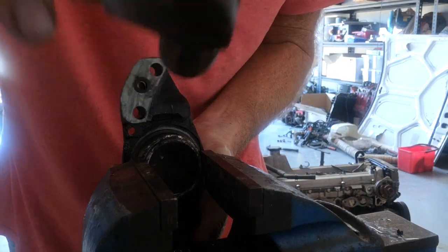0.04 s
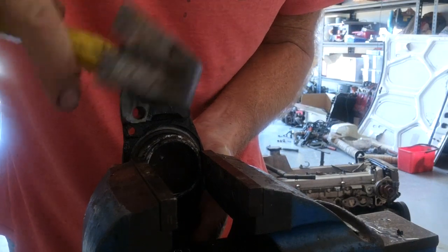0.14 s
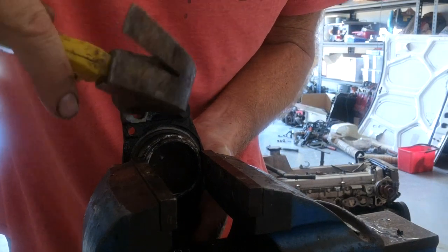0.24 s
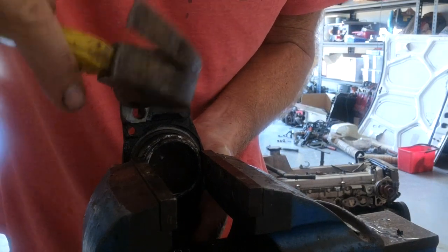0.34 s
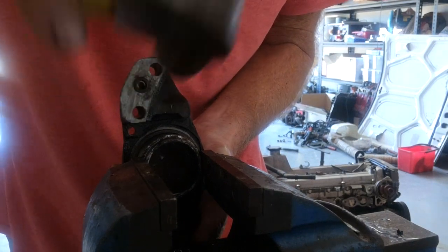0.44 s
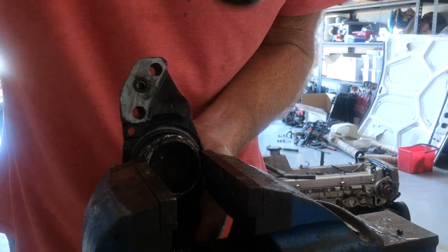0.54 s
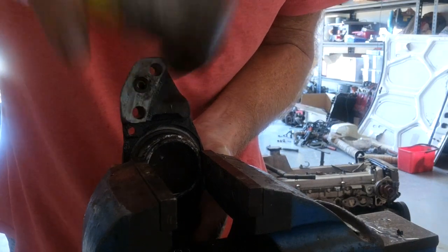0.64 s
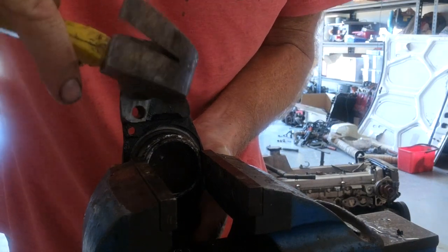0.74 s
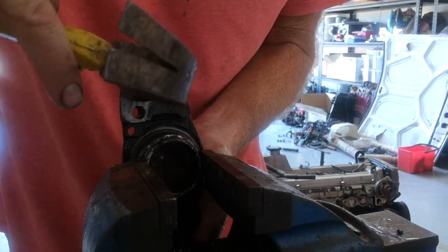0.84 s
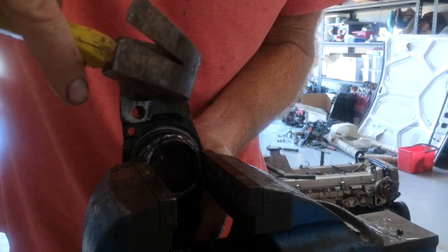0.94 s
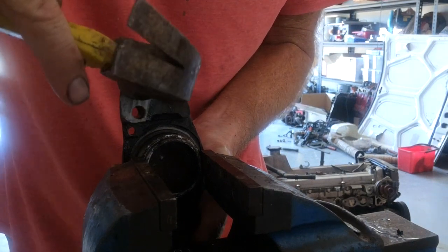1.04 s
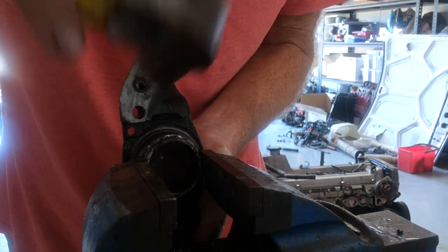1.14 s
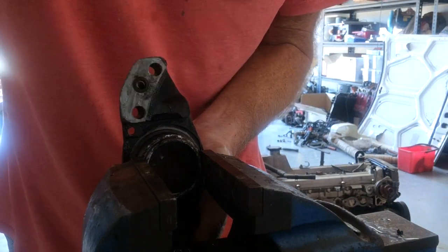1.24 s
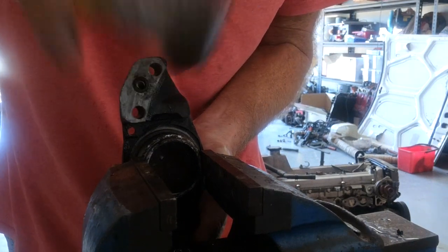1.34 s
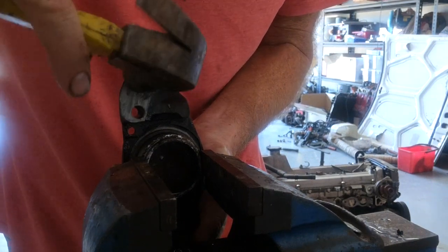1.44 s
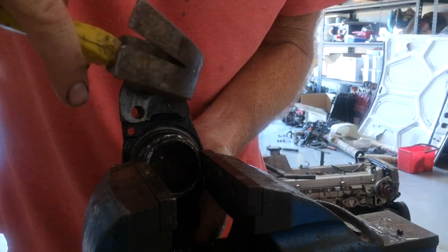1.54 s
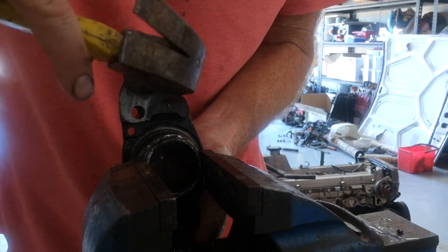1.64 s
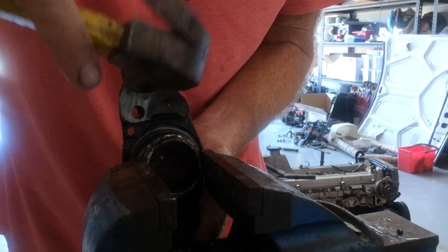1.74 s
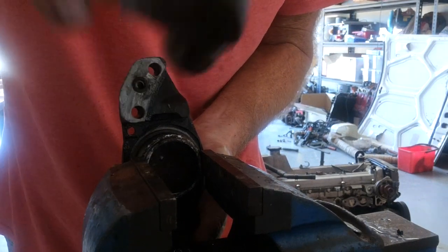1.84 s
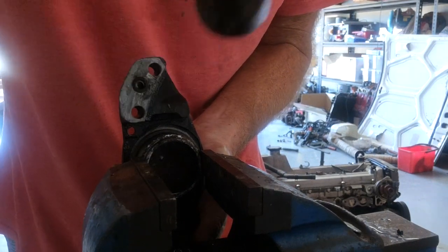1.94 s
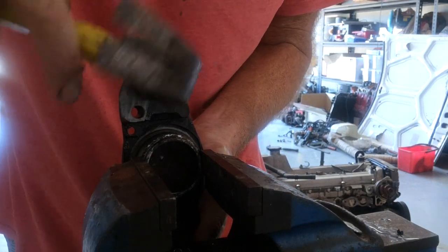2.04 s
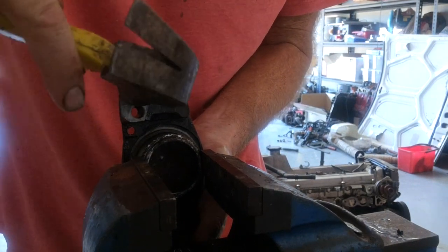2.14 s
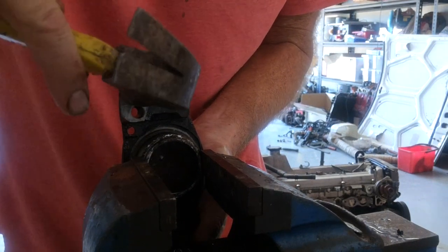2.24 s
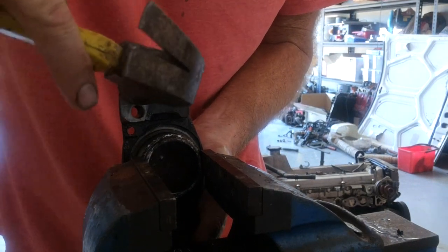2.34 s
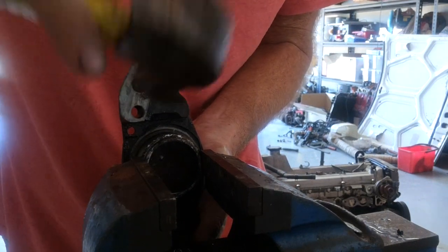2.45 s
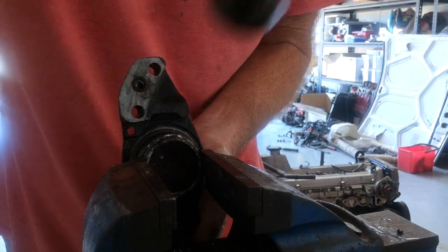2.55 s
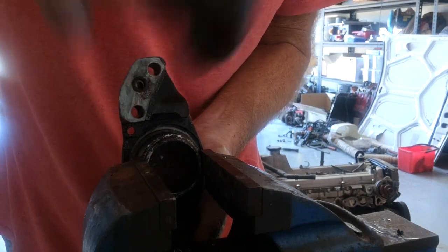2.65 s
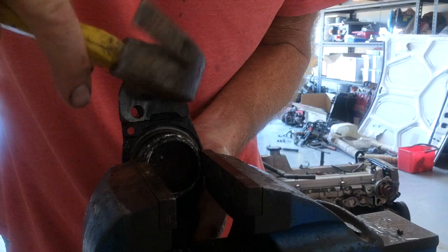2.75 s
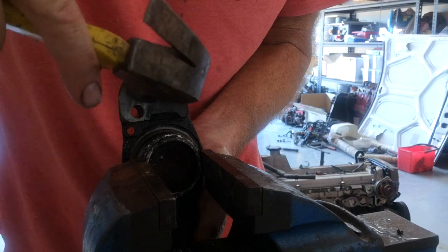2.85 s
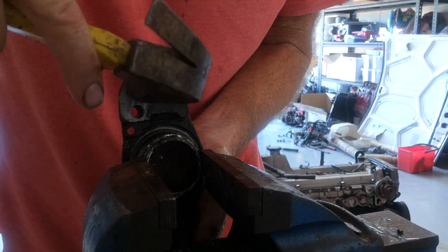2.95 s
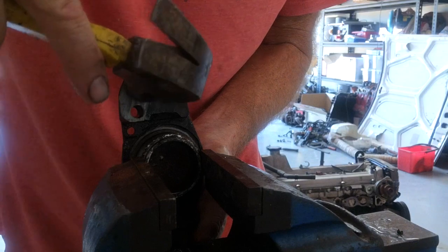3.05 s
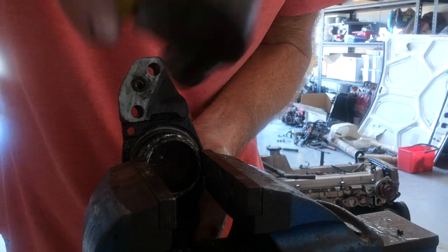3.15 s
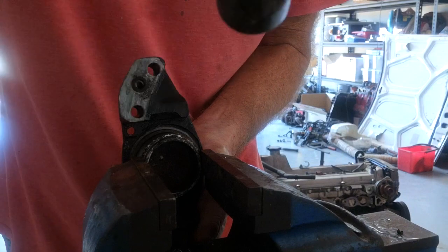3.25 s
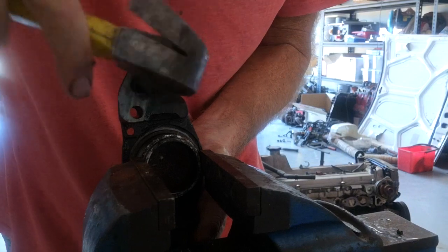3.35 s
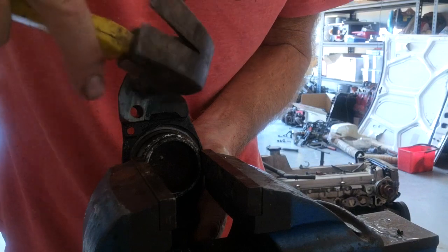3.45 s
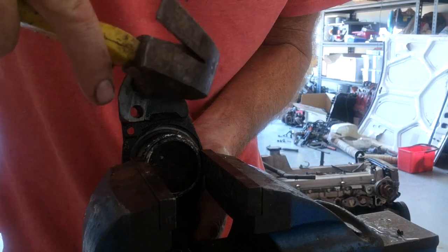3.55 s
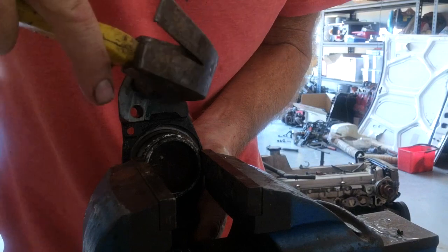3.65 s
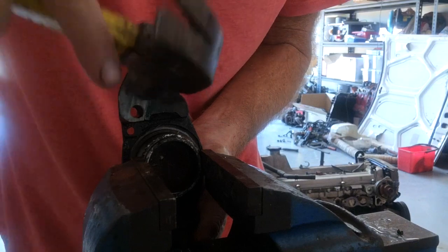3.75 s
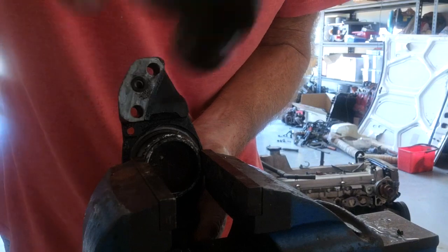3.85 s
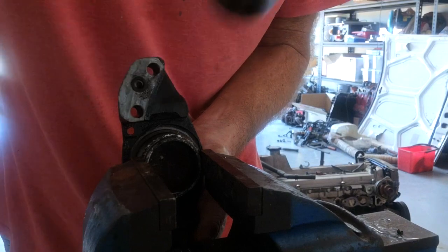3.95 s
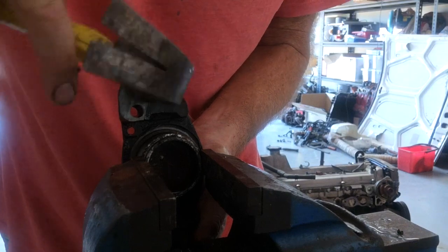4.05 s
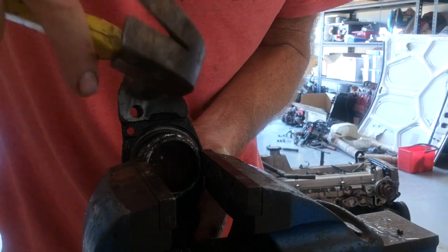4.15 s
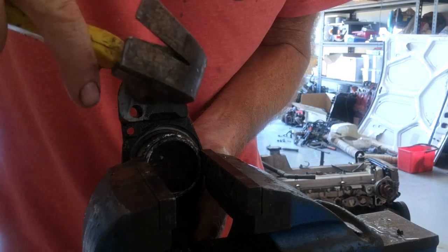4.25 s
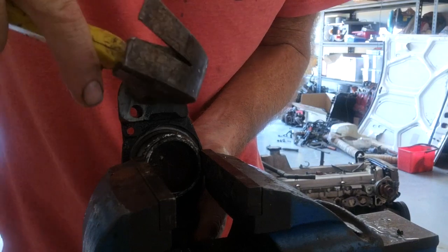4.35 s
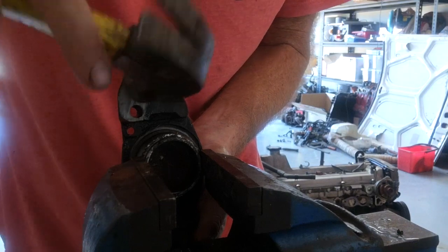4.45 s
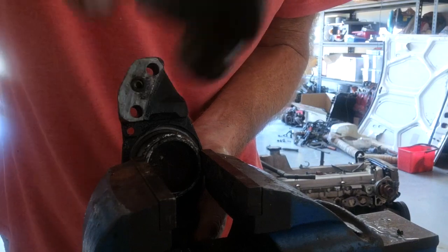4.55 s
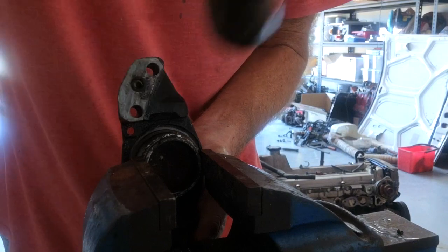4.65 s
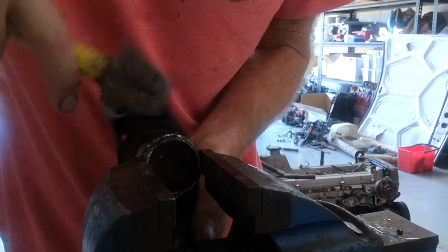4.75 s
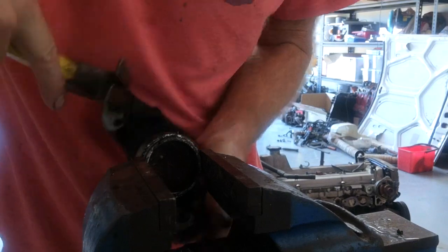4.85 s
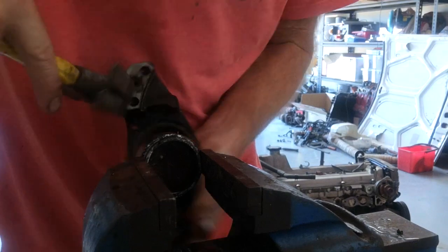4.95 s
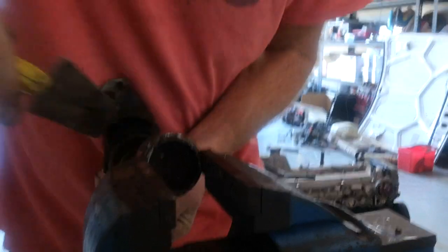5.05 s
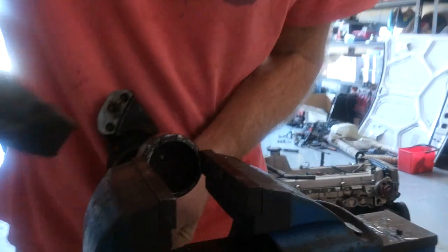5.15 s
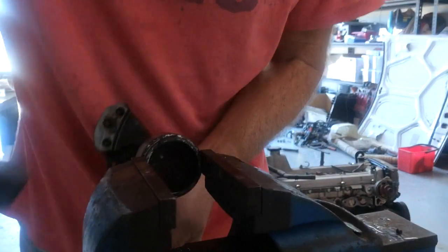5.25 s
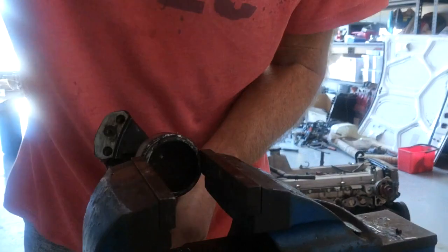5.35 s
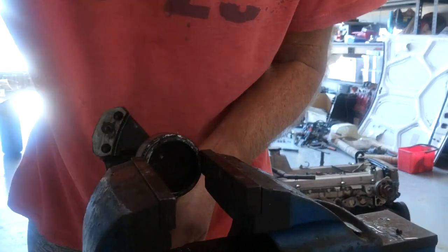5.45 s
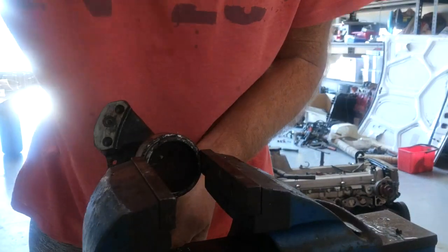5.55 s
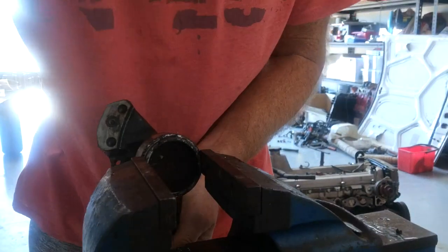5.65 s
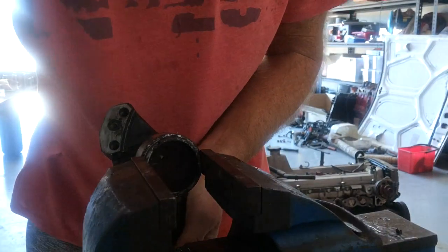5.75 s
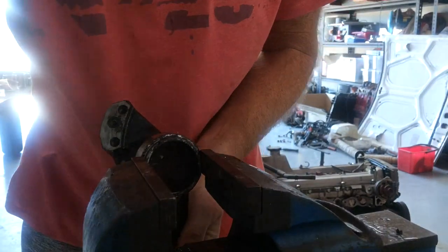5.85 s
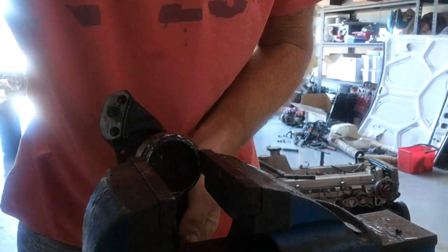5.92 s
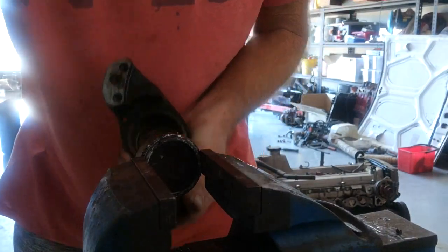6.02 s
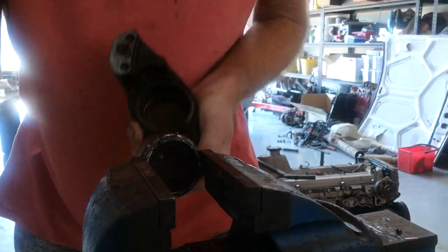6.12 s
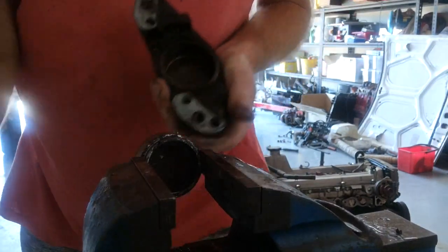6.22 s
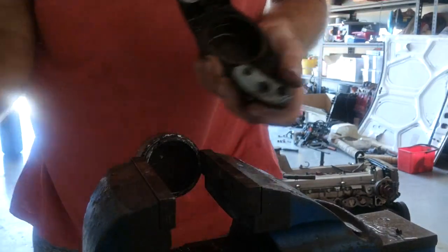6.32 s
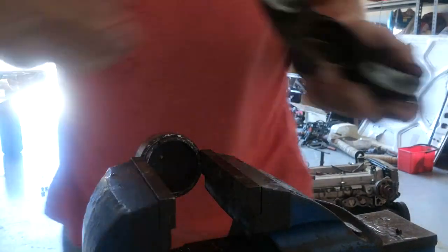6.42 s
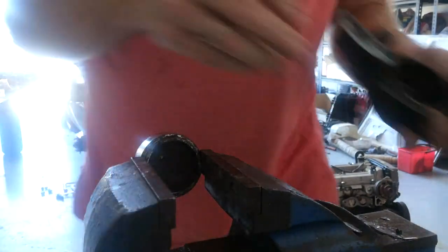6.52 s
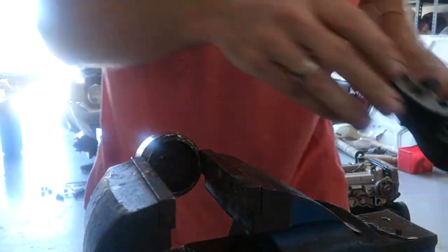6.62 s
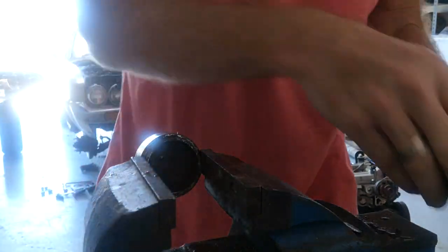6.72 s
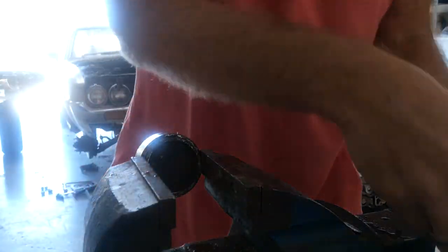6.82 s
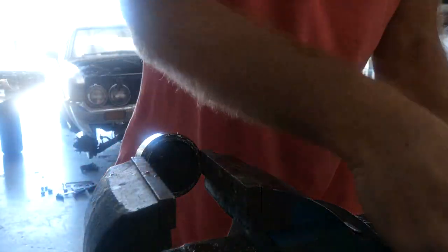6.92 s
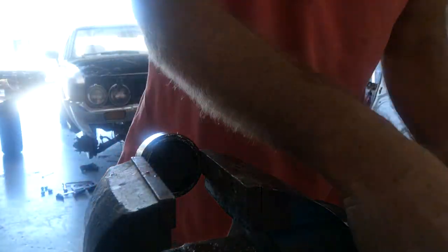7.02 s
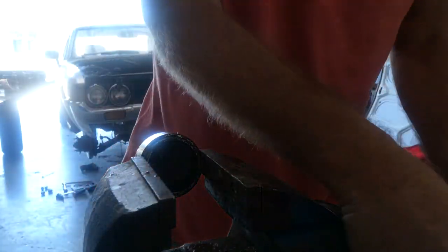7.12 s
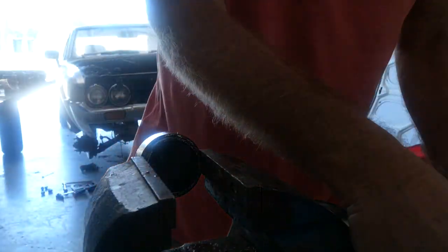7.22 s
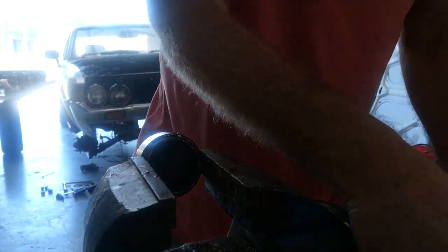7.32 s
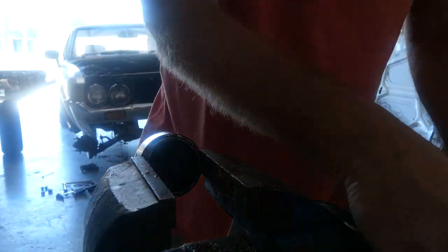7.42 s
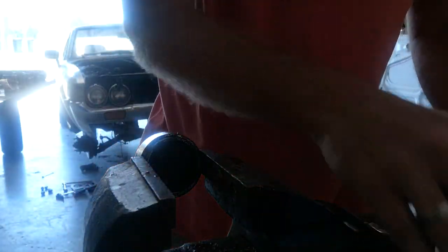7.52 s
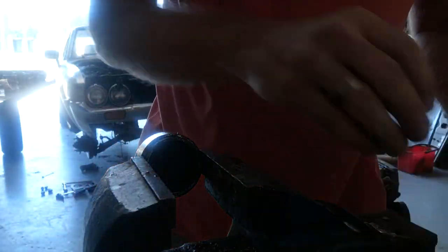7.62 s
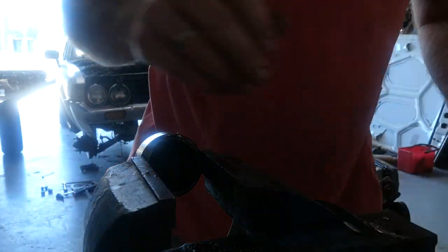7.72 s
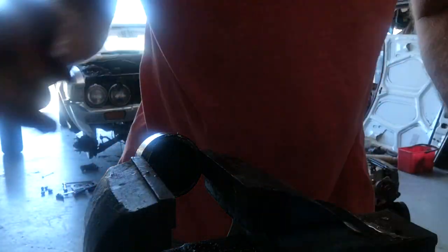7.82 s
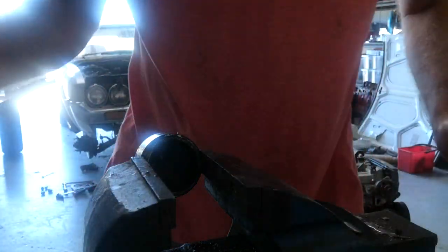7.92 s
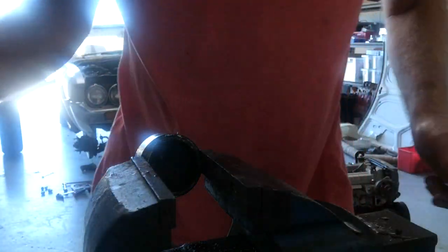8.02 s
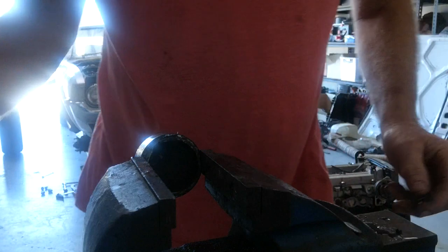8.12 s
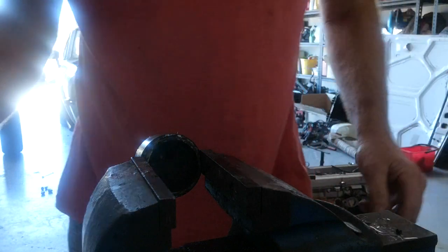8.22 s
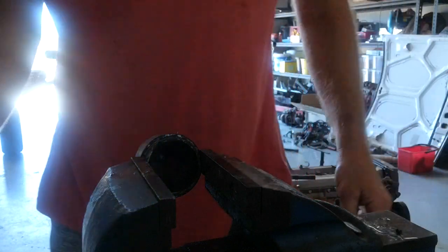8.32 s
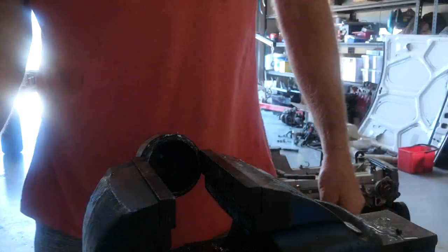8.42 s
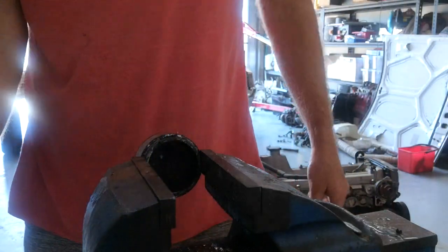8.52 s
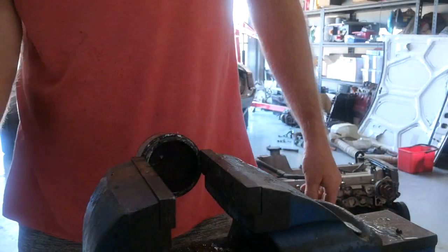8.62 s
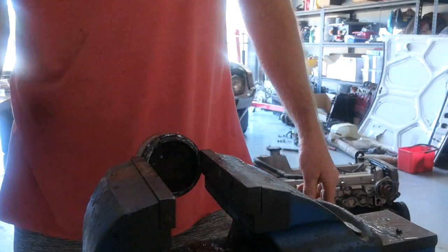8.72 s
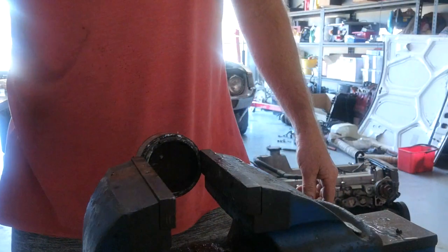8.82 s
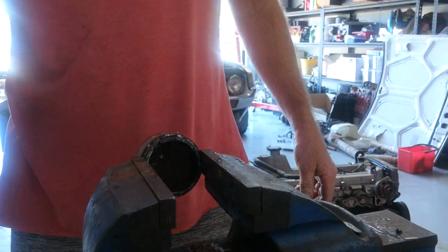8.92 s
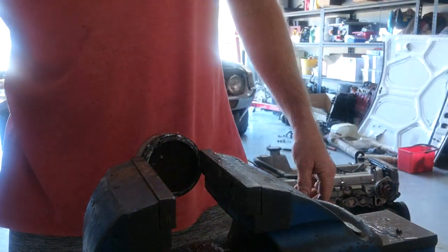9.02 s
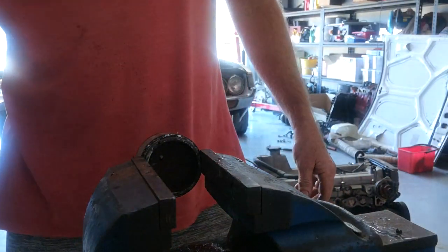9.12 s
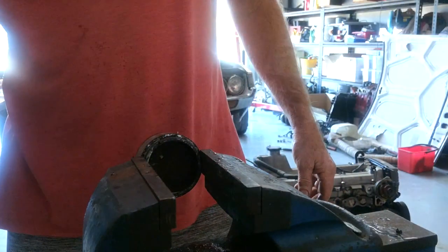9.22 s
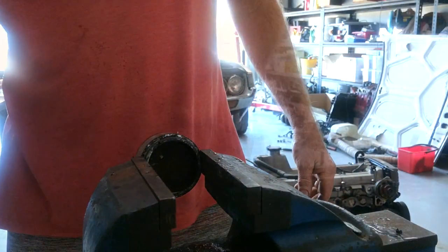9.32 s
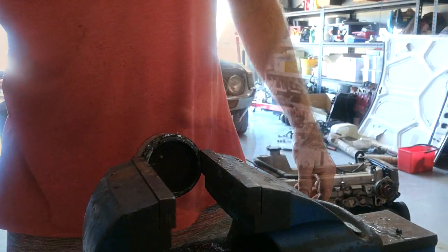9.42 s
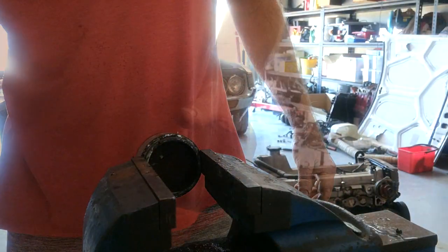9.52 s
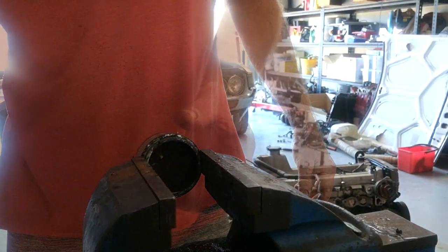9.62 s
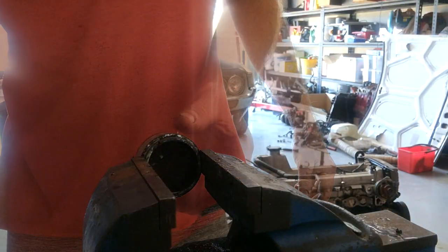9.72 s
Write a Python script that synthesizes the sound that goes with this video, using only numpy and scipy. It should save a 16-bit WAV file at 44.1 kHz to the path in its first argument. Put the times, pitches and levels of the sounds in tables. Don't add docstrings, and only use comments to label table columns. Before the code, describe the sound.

Loud, distorted metallic hammer blows come a little faster at first, then about every two thirds of a second, each with a sharp crack, short ring, heavy wooden thump and low rumble. Loose metal chatters faintly between. After the final hit come clacks, soft cloth movement, a muffled set-down and a sudden brush, with faint distant bird whistles and steady stereo microphone hiss in a garage.

```python
import sys
import numpy as np
from scipy import signal
from scipy.fft import rfft, irfft
from scipy.io import wavfile
from scipy.ndimage import uniform_filter1d

SR = 44100
rng = np.random.default_rng(int(sys.argv[2]) if len(sys.argv) > 2 else 0)


def dump_mix(stems):
    frames = np.atleast_2d(stems).T
    limited = np.clip(frames, -1, 1)
    pcm = np.round(limited * 32767).astype(np.int16)
    wavfile.write(sys.argv[1], SR, pcm)


def field_ratio(decibels):
    return 10 ** (np.asarray(decibels, dtype=float) / 20)


N = 430857

# start in seconds, blow level in dB, bench thump in dB,
# middle body (600-2000 Hz) in dB, brightness at the top in dB.
HAMMER_BLOWS = [
    (0.128, -4.5, 2, 0.5, 2),
    (0.6772, -4.5, 3.5, 2.5, -1),
    (1.354, 0, -1.5, -2.5, -0.6),
    (2.027, 1.5, -2, -1.4, 2.5),
    (2.694, 2, -1.5, -1, -0.63),
    (3.363, 0, 0, 0, -1.55),
    (4.05, 1, -2, -0.5, 0.55),
    (4.758, 3.5, -9.5, -0.8, 6),
]


def evened(x):
    return x / np.sqrt(np.mean(x ** 2) + 1e-20)


def read(points, hz):
    f, value = np.transpose(points)
    return np.interp(np.log(hz + 1), np.log(f + 1), value)


def add(mix, s, sound):
    part = mix[..., round(s * SR):][..., :sound.shape[-1]]
    part += sound[..., :part.shape[-1]]


def noise(shape, size=N):
    # frequency in Hz, left-right likeness from 0 to 1.
    likeness = [(30, 0.12), (150, 1), (300, 0.84), (600, 0.43), (1500, 0.015), (12000, 0.0098)]
    hz = np.fft.rfftfreq(size, 1 / SR)
    left, other = rfft(rng.standard_normal((2, size)))
    same = np.clip(read(likeness, hz), 0, 1)
    right = same * left + np.sqrt(1 - same ** 2) * other
    return evened(irfft(np.array([left, right]) * field_ratio(read(shape, hz)), size))


def ring(modes, spread_db=0., detune=0., wide=0., size=30000):
    hz, db, t60 = np.transpose(modes)[..., None]
    t = np.arange(size) / SR
    db = db + spread_db * rng.standard_normal(db.shape)
    turn = 2 * np.pi * hz * (1 + detune * rng.standard_normal(db.shape)) * t
    lead = wide * rng.uniform(-np.pi, np.pi, (2, len(modes), 1))
    fade = np.minimum((size - np.arange(size)) / (size / 4), 1)
    modes_heard = field_ratio(db - 60 * t / t60) * np.sin(turn + lead)
    return modes_heard.sum(1) * fade / np.sqrt(len(modes))


def garage(x):
    # frequency in Hz, time to die by 60 dB in seconds.
    room_t60 = [(40, .6), (110, .5), (280, .38), (740, .33), (1940, .36), (5120, .37), (9000, .4),
                (13000, .32), (14900, .31), (15400, .24), (15800, .08)]
    patchy_db, build_s = 2.5, 0.0033
    hz, t, z = signal.stft(noise([(20, 0.0064), (20000, 0.0046)], size=36000), SR, nperseg=256)
    patches = uniform_filter1d(rng.standard_normal(z.shape[1:]), size=2, axis=0)
    patches = evened(uniform_filter1d(patches, size=14, axis=1))
    decay_db = -60 * t / read(room_t60, hz)[:, None]
    tail = signal.istft(z * field_ratio(patchy_db * patches + decay_db), SR, nperseg=256)[1]
    tail = tail * np.minimum(np.arange(tail.shape[1]) / SR / build_s, 1)
    return signal.fftconvolve(x[None], tail / np.linalg.norm(tail[0]), axes=1)


def swell(s, rise, fall, db):
    t = np.arange(N // 32 + 1) * 32 / SR
    return field_ratio(db - 10 * np.maximum((s - t) / abs(rise), (t - s) / abs(fall))) ** 2


def loudness(power):
    return np.interp(np.arange(N) / 32, np.arange(len(power)), np.sqrt(power))


def background():
    # frequency in Hz, level in dB.
    rumble = [(20, -3), (34, -7), (52, -2.5), (90, -7.5), (160, -13), (350, -26), (480, -28), (700, -35.5),
              (1500, -45), (3000, -79.5)]
    # frequency in Hz, level in dB.
    hiss = [(180, -32.5), (300, -3.5), (464, -2), (2520, -8.5), (6770, -11.5), (9160, -7.5), (15100, -10.5),
            (16500, -24)]
    # peak in seconds, rise in seconds, fall in seconds, level in dB.
    leaning = [
        (5.96, 0.13, 0.12, -67),
        (7.35, 0.07, .05, -52),
        (9.39, .15, .5, -73),
    ]
    air_db, hiss_db = -72, -72.5
    hum_fall_s, hum_db = 0.55, -47.5
    shudder_delay_s, shudder_rise_s, shudder_fall_s = 0.14, 0.086, 0.11
    shudder_db, shudder_growth = -36, 1.9
    power = field_ratio(air_db) ** 2 + sum(swell(*row) for row in leaning)
    power = power + swell(-0.27, .01, hum_fall_s, hum_db)
    for s, db, *_ in HAMMER_BLOWS:
        power = power + swell(s, .003, hum_fall_s, hum_db)
        shudder_level = shudder_db + shudder_growth * db
        power = power + swell(s + shudder_delay_s, shudder_rise_s, shudder_fall_s, shudder_level)
    return loudness(power) * noise(rumble) + field_ratio(hiss_db) * noise(hiss)


def chirp(length, start_hz, end_hz, db):
    octave_db, octave_db_per_slide, wet_db = -47.5, 85, 1
    t = np.arange(0, length, 1 / SR)
    flutter = evened(uniform_filter1d(rng.standard_normal(len(t)), 120))
    pitch_hz = np.linspace(start_hz, end_hz, len(t)) + 200 * flutter
    turn = 2 * np.pi * np.cumsum(pitch_hz) / SR
    octave = field_ratio(octave_db + octave_db_per_slide * np.log(start_hz / end_hz)) * np.sin(2 * turn)
    dry = (np.sin(turn) + octave) * signal.windows.tukey(len(t), .5)
    out = field_ratio(wet_db) * garage(dry)
    add(out, 0, dry)
    return field_ratio(db) * out


def rocking():
    # first knock in seconds, last in seconds, period in seconds, shrink factor per rock.
    rocks = [(.005, .12, .073, .95), (.364, .67, .075, .943), (.89, 1.35, .079, .949),
             (1.669, 2.02, .0535, .94), (2.251, 2.69, .078, .943), (2.984, 3.36, .074, .955),
             (3.789, 4.04, .064, .945), (4.346, 4.75, .072, .945)]
    # near edge in dB, far edge in dB.
    edge_levels = [(-48, -48.5), (-50, -56.5), (-49.5, -60.5), (-54.5, -61), (-50, -62.5), (-53.5, -61),
                   (-56, -59.5), (-53.5, -56)]
    # frequency in Hz, level in dB, time to die by 60 dB in seconds.
    near_modes = [(480, -7, 0.22), (600, -7.5, 0.055), (900, 0.5, 0.049), (1130, -7.5, 0.032),
                  (1890, -18.5, 0.082)]
    far_modes = [(454, -5, 0.07), (590, -2.5, 0.038), (900, -1, 0.05), (1690, -9, 0.12)]
    near, far = np.zeros((2, N))
    for (first, last, period, shrink), (near_db, far_db) in zip(rocks, edge_levels):
        gaps = period * shrink ** np.arange(12)
        at = first + np.cumsum(gaps) - gaps
        for train, s, db in ((near, at, near_db), (far, at + .44 * gaps, far_db)):
            level = field_ratio(db + 1.2 * rng.standard_normal(len(s)))
            in_time = s < last
            train[(s[in_time] * SR).astype(int)] = level[in_time]
    contact = np.minimum(np.arange(6000) / SR / 0.0013, 1)
    dry = 0
    for train, modes in ((near, near_modes), (far, far_modes)):
        dry = dry + signal.oaconvolve(train, ring(modes, size=6000)[0] * contact)[:N]
    return dry + field_ratio(-6.5) * garage(dry)[:, :N]


def bench():
    # frequency in Hz, level in dB, time to die by 60 dB in seconds,
    # first swing with (1) or against (-1) the blow.
    wood = [(59, -11.5, .28, 1), (69, -26, .5, 1), (87.4, 3.2, .091, -1), (138.7, -.6, .124, 1),
            (163, -15, .135, -1), (219.6, -3, .093, 1), (267, -25, .28, 1)]
    delay_s, swell_s = .0012, .019
    hz, db, t60, sense = np.transpose(wood)[..., None]
    t = np.maximum(np.arange(30000) / SR - delay_s, 0)
    db = db + 1.2 * rng.standard_normal(db.shape)
    hz = hz * (1 + .004 * rng.standard_normal(hz.shape))
    swings = sense * field_ratio(db - 60 * t / t60) * np.sin(2 * np.pi * hz * t)
    return swings.sum(0) * (1 - np.exp(-t / swell_s)) ** 2


def blow(db, thump_db, body_db, top_db, spot, rings):
    # frequency in Hz, level in dB per Hz.
    crack = [(120, -26.5), (200, -10.5), (360, -16), (482, -4.5), (569, -13.5), (821, -10.5), (1210, -11.5),
             (2910, -7.5), (6760, -10), (7830, -7), (11300, -13.5), (12500, -12), (13100, -19),
             (14400, -16.5), (16000, -23)]
    # frequency in Hz, level in dB, time to die by 60 dB in seconds.
    families = [
        [(1840, -8, .03), (2620, -6, .05), (3040, -7, .04), (3500, -6, .03)],
        [(4900, -8, .04), (5850, -8, .04), (6190, -5, .07), (7222, -7, .06)],
        [(7340, -9, .08), (7790, -6, .05), (8050, -7, .05), (8260, -8, .04)],
        [(8750, -5, .04), (9500, -6, .04), (9680, -5, .05), (9960, -4, .06), (10200, -7, .04)],
        [(11000, -10, .04), (11930, -8, .05), (13500, -12, .04)],
    ]
    # frequency in Hz, level in dB, time to die by 60 dB in seconds.
    vise = [(245, -23, 0.48), (288, -25, .36), (465.7, -19.5, 0.14), (830, -22, .12)]
    # frequency in Hz, left minus right in dB.
    lean = [(60, -.8), (300, -3.3), (1200, -1.5), (2800, -.4), (5500, -1.8), (9500, .3), (13000, 4.5)]
    clatter_s, ring_swell_s, contact_s = 0.021, .007, 0.0009
    ring_db, bench_db, snap_db, drive_db = 7, 4, 25, -1
    wet_db, ring_room_db, steel_room_db, thump_room_db = -3, -13, -3, -9
    spot_colour, lumpy_db, lump_hz = 0.56, 1.24, 286.3

    t = np.arange(30000) / SR
    colour = []
    for hz, level in crack:
        colour.append((hz, level + top_db * min(hz, 11000) / 12000 + body_db * (600 < hz < 2000)))
    clatter = noise(colour, size=30000) * np.exp(-.5 * (t / clatter_s) ** 2)
    steel = sum(field_ratio(level) * ring(modes, 1., detune=.004, wide=1) for level, modes in zip(spot, families))
    notes = field_ratio(ring_db) * ring(rings, wide=0.79) * (1 - np.exp(-t / ring_swell_s))
    thump = field_ratio(thump_db + bench_db) * (bench() + ring(vise, 2.5, detune=.025))
    snap = irfft(field_ratio(read(colour, np.fft.rfftfreq(512, 1 / SR))))
    snap = np.fft.fftshift(snap) * np.hanning(512)

    to_room = field_ratio(ring_room_db) * notes[0] + field_ratio(steel_room_db) * steel[0] + field_ratio(thump_room_db) * thump[0]
    add(to_room, 0, field_ratio(snap_db) * snap / np.linalg.norm(snap))
    out = field_ratio(wet_db) * garage(to_room)
    add(out, 0, clatter + steel + notes + thump)

    hz = np.fft.rfftfreq(out.shape[1], 1 / SR)
    family_hz = [np.mean(modes, 0)[0] for modes in families]
    spot_db = spot_colour * np.interp(hz, [0] + family_hz, np.r_[0, spot - np.mean(spot)])
    lumps = np.interp(hz / lump_hz, np.arange(100), rng.standard_normal(100))
    lumps_db = lumpy_db * lumps * np.clip(hz / 1000 - .5, 0, 1)
    colour_db = read(lean, hz) * [[.5], [-.5]] + spot_db + lumps_db
    out = irfft(rfft(out) * field_ratio(colour_db), out.shape[1])[:, :SR]
    return field_ratio(db + drive_db) * out * np.minimum(np.arange(SR) / SR / contact_s, 1) ** 2


def knock(db, hz, t60, thump_db, ring_db):
    # frequency in Hz, level in dB, time to die by 60 dB in seconds.
    table_top = [(54, -9, .45), (140, -7, .2), (172, -2, .09), (231, -1, .07), (330, -7, .05),
                 (480, -9, .05)]
    t = np.arange(16000) / SR
    shape = [(hz / 8, -14), (hz / 2, -3), (hz * 1.2, 0), (hz * 2.5, -16), (hz * 16, -40)]
    burst = noise(shape, size=16000) * field_ratio(-60 * t / (.5 * t60))
    dry = burst + field_ratio(ring_db) * ring([(hz, 3, t60)], size=16000)
    dry = dry * np.minimum(t * hz / 2, 1)
    thump = field_ratio(thump_db) * ring(table_top, size=16000) * (1 - np.exp(-t / 0.0027))
    out = field_ratio(-10.5) * garage(dry[0] + 1.6 * thump[0])
    add(out, 0, dry + thump)
    return field_ratio(db) * out


def rustle():
    # peak
    # in seconds, rise in seconds, fall in seconds, level in dB, body of the rub in dB.
    cloth_strokes = [(5.1, 0.053, 0.11, -63.5, 2.5), (5.4, 0.24, 0.36, -71.5, -16.5),
                     (5.68, 0.014, 0.033, -65, -6), (5.8, .2, .15, -64, -11.5), (5.89, 0.048, 0.032, -53.5, -5),
                     (6.0, .06, .1, -66.5, -5.5), (6.17, 0.13, .1, -61, -8), (6.36, 0.24, 0.36, -62, -6),
                     (6.6, .05, .08, -63.5, -13), (6.75, 0.028, 0.124, -52, -12.5),
                     (6.99, 0.17, 0.031, -59.5, -14), (7.09, .05, .1, -66, -9), (5.32, .02, 0.047, -82, 3),
                     (6.9, 0.026, .08, -73.5, 4),
                     (7.25, 0.012, 0.0294, -58.5, -6), (7.373, 0.00091, 0.0079, -48.5, 7.5),
                (7.39, .01, 0.054, -74.5, 9), (7.78, .2, .15, -69, -10), (8.04, 0.066, .08, -68, -1),
                (8.2, 0.16, .15, -75, 5), (8.33, .04, .12, -71, -8), (8.6, 0.087, 0.17, -64.5, -2.5),
                (8.88, 0.027, .1, -77, 8.5), (9.22, 0.0063, 0.048, -43.5, -2.5),
                (9.244, 0.016, 0.037, -41, -9.5), (9.33, 0.028, 0.17, -64, -1),
                (9.535, .02, 0.1406, -65, -5), (9.75, .2, 0.19, -67.5, -10)]
    # time in seconds, left minus right in dB.
    hands = [(5.1, -2), (5.45, 2), (5.89, 2.5), (6.3, 0), (6.75, 1.5), (7.1, -6), (7.4, -1.5), (7.75, -0.5),
             (9.77, 1.5)]
    # frequency in Hz, level in dB per Hz.
    fizz_colour = [(1000, -28.5), (5000, -8.5), (7500, -8), (9500, 2.5), (12000, -3.5), (16000, -13)]
    rub_colour = [(200, 4.5), (600, -1), (2000, 2), (5000, -8.5), (8000, 3.5), (16000, -34)]
    strokes = cloth_strokes
    fizz = loudness(sum(swell(s, rise, fall, db) for s, rise, fall, db, _ in strokes))
    rub = loudness(sum(swell(s, rise, fall, db + body_db) for s, rise, fall, db, body_db in strokes))
    pan_db = np.interp(np.arange(N) / SR, *np.transpose(hands))
    grain = field_ratio(1.45 * evened(uniform_filter1d(rng.standard_normal(N), 150)))
    cloth = fizz * noise(fizz_colour) + rub * noise(rub_colour)
    return cloth * grain * field_ratio(np.array([pan_db, -pan_db]) / 2)


def scene():
    # start in seconds, length in seconds, start pitch in Hz, end pitch in Hz, level in dB.
    whistles = [(.001, 0.034, 7700, 8000, -65), (0.187, 0.1, 7450, 7270, -48),
                (5.893, 0.042, 8040, 8100, -77), (5.953, 0.053, 7840, 7820, -64.5),
                (7.989, .03, 7820, 7780, -73.5), (8.302, .068, 6900, 5000, -61.5),
                (8.374, 0.049, 4605, 3460, -79), (8.36, .06, 5400, 4300, -72),
                (8.69, 0.058, 6640, 5690, -65)]
    # levels in dB of the five steel families, low to high.
    spots = [(-3.5, -1.5, -2, -3, -3), (-2.5, -3, -11, 1.5, -6.5), (-7, -4.5, -5, -2.5, -5.5),
             (-7.5, -3.5, -6, 0, -6.5), (-7.5, -4, -1, 0, -4.5), (-5.5, -5, -2.5, -4, -6),
             (-6.5, -4.5, 0, -1.5, -4), (-8, -7, 0, 0, -2.5)]
    # frequency in Hz, level in dB,
    # time to die by 60 dB in seconds.
    blow_rings = [
        [(1250, -5.5, .09), (3580, -6.5, .1), (4420, 6, .07), (7208, 2, 0.066), (7305, -0.5, 0.17),
         (7660, 4, 0.065), (10100, -5, 0.18), (12414, 6, 0.082)],
        [(2000, -5, 0.18), (2855, 2.5, 0.053), (3680, -1.5, .06), (4414, 3, .06), (8860, 1, 0.046),
         (10330, -3, .08), (12200, -6, .16)],
        [(1990, -4, 0.27), (3430, -6, 0.16), (4430, 4.5, 0.048), (7612, 5.5, .06), (7930, -2, .12),
         (10080, 0, 0.092), (12400, -6, .14), (12330, 5, 0.091)],
        [(924.6, -6, .1), (2857, 3, .09), (4200, -8, 0.17), (7230, 1, .05), (7601, 5, .06), (7970, -2.5, .17),
         (12215, 0, 0.098)],
        [(2870, -1.5, .1), (6220, -1, .09), (6815, -4, 0.08), (7945, -3, 0.15), (7985, 1.5, 0.12),
         (8470, -3, 0.11), (12320, 0, .1)],
        [(1250, 0, .05), (2870, 2, 0.052), (4195, -8, .14), (4400, 3, 0.046), (5988, 3, 0.074),
         (7560, 6.5, 0.062), (7970, -3, .17), (12328, 6, 0.088)],
        [(1840, 0, 0.09), (2860, 4, .07), (4194, -8, .11), (6035, 4, .06), (7680, 5.5, .07), (7975, 0, 0.16),
         (12190, -6.5, .17), (12328, 8, 0.085)],
        [(4431, 0, .05), (7800, 3, .05), (7935, -1, 0.15), (9440, 1, 0.088), (12200, 5, 0.069),
         (12230, -9, .18)],
    ]
    # start in seconds, peak in dB, centre in Hz, time to die by 60
    # dB in seconds, table thump in dB.
    clacks = [(1.248, -61, 2390, .029, -19.5), (2.275, -43.5, 1980, 0.052, -10),
              (2.33, -47.5, 1773, 0.098, -14), (4.807, -13, 2376, 0.049, -30),
              (4.876, -18, 1500, 0.031, -12), (4.908, -23, 1300, 0.034, -14.5),
              (4.91, -23.5, 3600, 0.036, -30.5), (5.06, -39.5, 800, 0.14, -3),
              (5.07, -45, 1810, 0.096, -14.5), (5.082, -52, 2400, .06, -20),
              (5.069, -39.5, 9850, 0.029, -24.5), (5.612, -62, 10900, 0.011, -22),
              (5.678, -44, 9540, 0.013, -17), (5.679, -54.5, 900, 0.039, -13.5),
              (6.081, -49.5, 4195, 0.044, -24), (6.381, -48, 800, 0.11, -8),
              (6.382, -47.5, 1400, 0.11, -19), (6.733, -59.5, 2300, .12, -20), (6.89, -60, 550, .15, -10),
              (7.2, -31, 401, 0.15, 13), (7.241, -37.5, 1793, 0.094, -3.5), (7.243, -32, 590, 0.084, -14),
              (7.371, -30.5, 3347, 0.01, -5), (7.373, -34.5, 557, 0.054, -22.5),
              (8.025, -64.5, 503, 0.038, 11), (8.14, -63, 1000, 0.09, -11.5), (8.88, -62.5, 499, 0.11, -8),
              (9.389, -61.5, 1500, .06, -10), (9.199, -49, 302, .045, 7.5), (9.212, -38.5, 459, 0.045, -3),
              (.13, -13, 3700, .06, -30), (.678, -9, 3600, .06, -30), (.679, -12, 2000, .06, -30),
             (.68, -14, 480, .12, -30), (.85, -39, 200, .2, -10), (1.357, -12, 3400, .06, -30),
             (1.56, -42, 220, .2, -10), (2.96, -44, 250, .15, -10), (4.885, -26, 250, .14, -8),
             (5.065, -45, 3000, .1, -20), (5.07, -38, 250, .2, -8), (7.241, -50, 8000, .015, -30),
             (7.3715, -26, 8500, .009, -30)]
    clinks = [(1.806, -62.5, 1350, .03, -30.5), (3.145, -61, 1403, 0.028, -30.5),
              (1.847, -65, 9480, 0.045, -29), (2.262, -36.5, 238.5, 0.17, -12.5),
              (2.343, -45, 251, .1, -15.5), (3.728, -52.5, 504, 0.18, -28), (3.826, -61, 1367, 0.028, -2.5),
              (4.875, -22, 1000, 0.024, -30), (4.875, -26, 1400, 0.035, -29.5),
              (4.876, -21, 1775, 0.031, -31), (4.877, -22.5, 2094, 0.062, -30),
              (4.907, -25, 1000, 0.019, -30), (4.907, -23.5, 1540, 0.028, -30),
              (4.908, -29, 2094, 0.082, -30), (5.07, -51.5, 1520, 0.077, -30),
              (5.066, -57.5, 2096, .04, -30), (5.888, -60, 2554, 0.054, 1.5), (6.31, -71, 900, 0.07, -20),
              (7.189, -51, 600, 0.034, -18), (7.214, -26.5, 243, 0.054, -16), (8.88, -73, 596.7, .1, -1.5),
              (9.388, -59.5, 1117, 0.078, 13.5), (9.43, -55.5, 198.6, .13, 7.5)]
    mix = background() + rocking() + rustle()
    for s, *row in whistles:
        add(mix, s, chirp(*row))
    for (s, *row), spot, rings in zip(HAMMER_BLOWS, spots, blow_rings):
        add(mix, s, blow(*row, spot, rings))
    for contacts, ring_db in ((clacks, -12.5), (clinks, 1)):
        for s, *row in contacts:
            add(mix, s, knock(*row, ring_db))
    return mix


def low_pass(x):
    return signal.sosfilt(signal.butter(12, 16610, fs=SR, output="sos"), x)


def record(dry):
    top_hz, top_db = 15800, -15
    edge = [0, top_hz - 100, top_hz + 100, SR / 2]
    shelf = signal.firwin2(191, edge, [1, 1, field_ratio(top_db), field_ratio(top_db)], fs=SR)
    clipped = np.clip(dry, -1, 1)
    return low_pass(signal.oaconvolve(clipped, shelf[None], "same"))


dry = scene()
out = record(dry)
dump_mix(out)
```